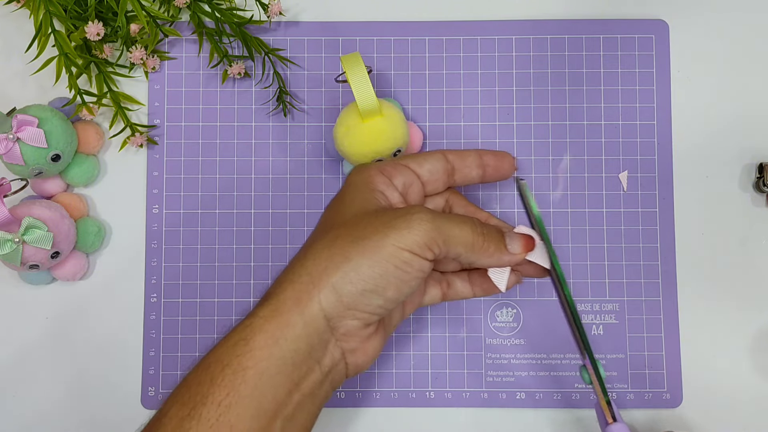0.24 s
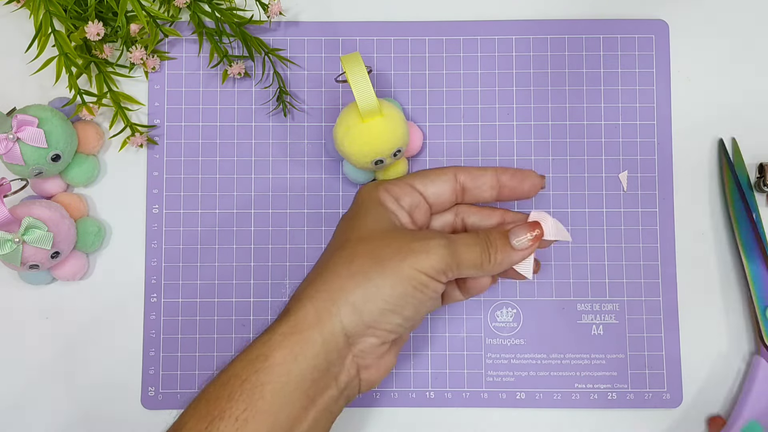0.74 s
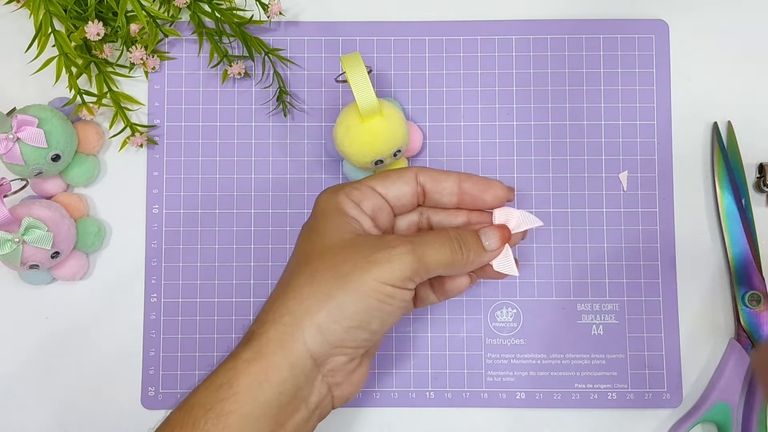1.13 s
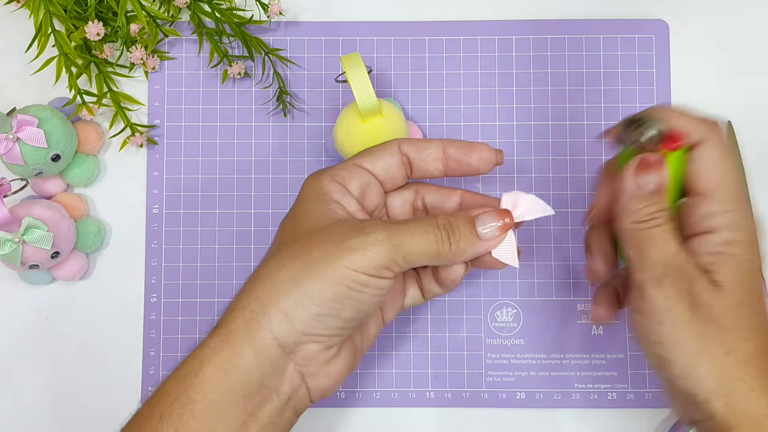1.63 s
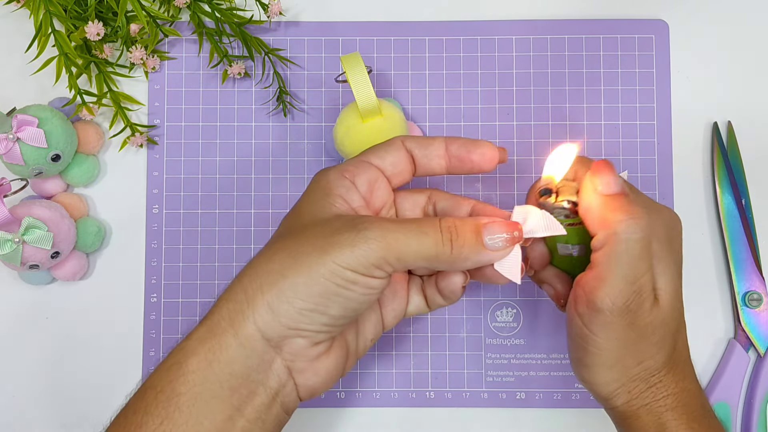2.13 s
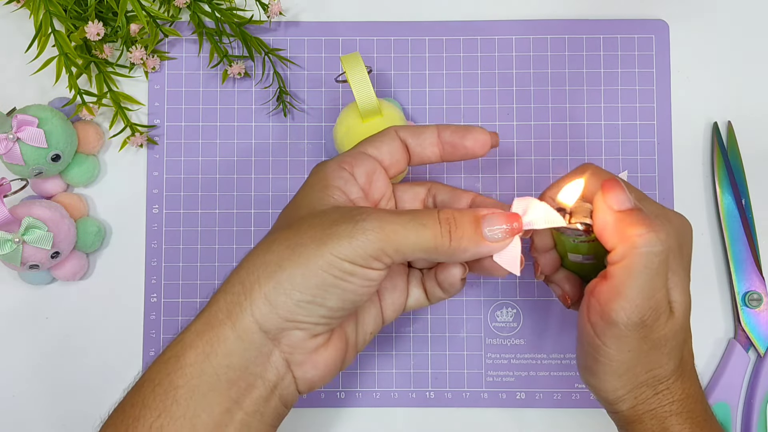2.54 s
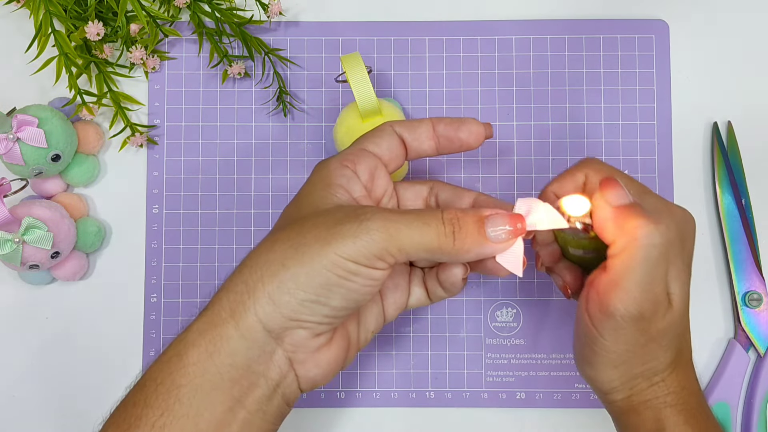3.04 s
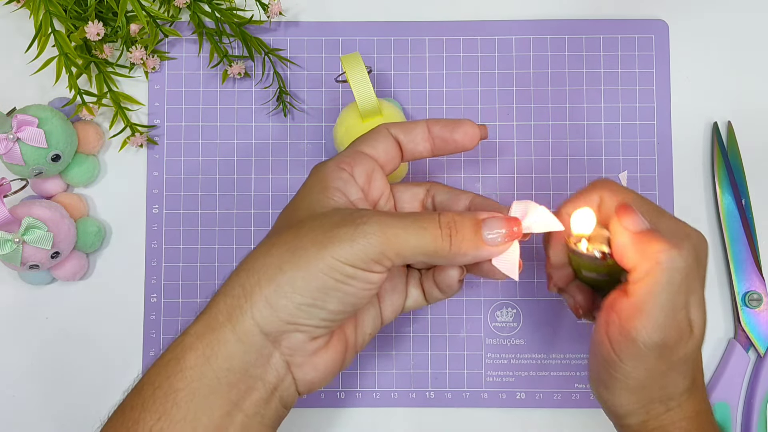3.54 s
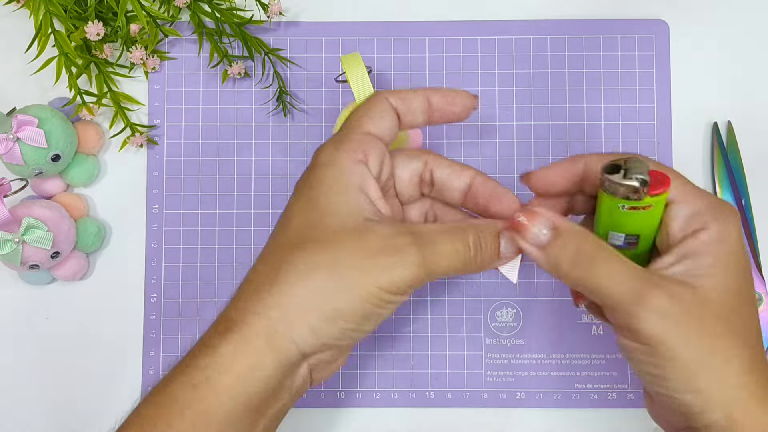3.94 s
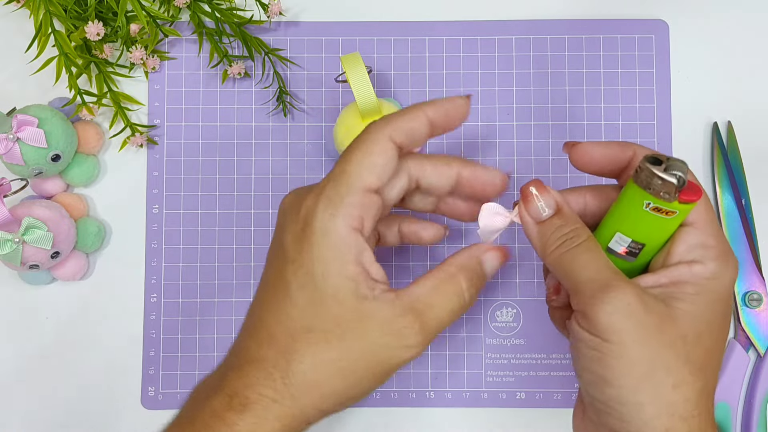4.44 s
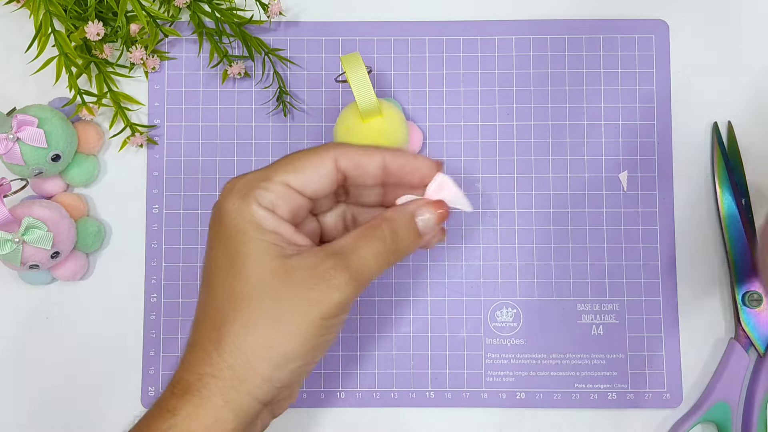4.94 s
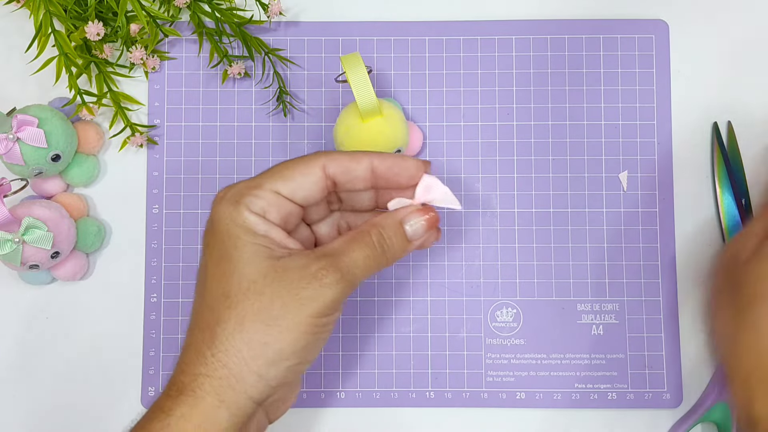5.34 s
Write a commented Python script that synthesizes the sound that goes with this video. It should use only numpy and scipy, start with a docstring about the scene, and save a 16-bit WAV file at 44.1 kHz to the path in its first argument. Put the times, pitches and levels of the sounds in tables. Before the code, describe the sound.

In a small hard room, close stereo microphone with bass leaning left: a faint crisp scissor snip, then scissors laid on a craft table with a knock and a rapid metallic, plastic clatter. Light finger rustle, a quick rising spark-wheel rasp ending abruptly, tiny clicks, a quiet pause, a lighter click and soft rubs, then the lighter is put down with hard knocks, short scrapes and fading taps over low rumble.

```python
"""Over a steady low rumble, scissors shear a ribbon (noise through a sharp resonance) and are laid on a
craft table with a few bounces (noise cracks, decaying modes, scraping contacts). Fingers rustle as fine
grains; a lighter's spark wheel swells as its teeth bite faster, then stops. The lighter is handled with
clicks and rubs and put back with further knocks. A small hard room reflects all of it into two microphone
ports, the right one poor in bass, and a peak limiter."""
import sys
import numpy as np
from scipy import signal
from scipy.fft import rfft, irfft
from scipy.io import wavfile

SR = 44100
rng = np.random.default_rng(int(sys.argv[2]) if len(sys.argv) > 2 else 0)


def digitize_waveform(pressure):
    """Quantize a signal to 16-bit integers and store it at the path in sys.argv[1].

    Rows of a 2-D input are taken as channels; values are limited to [-1, 1].
    """
    field = np.atleast_2d(pressure).T
    bounded = np.clip(field, -1, 1)
    quanta = np.round(bounded * 32767).astype(np.int16)
    wavfile.write(sys.argv[1], SR, quanta)


N = 246959  # length in samples


def amp(db):
    """Decibel law: the amplitude gain of a level in dB."""
    return 10 ** (np.asarray(db) / 20)


def rms_one(x):
    """Power normalisation: scaled to rms 1."""
    return x / np.sqrt(np.mean(x ** 2) + 1e-20)


def at_hz(points, hz):
    """Interpolation along a logarithmic frequency axis."""
    table = np.array(points)
    return np.interp(np.log(hz), np.log(table[:, 0]), table[:, 1])


def convolve(x, response):
    """Linear superposition: causal convolution, cut to length."""
    return signal.fftconvolve(np.atleast_2d(x), np.atleast_2d(response), axes=1)[:, :N]


def colour(x, spectrum):
    """Minimum-phase filtering: the dB shape fixes the phase through the folded cepstrum."""
    size = 8192
    hz = np.maximum(np.fft.rfftfreq(size, 1 / SR), 1)
    cepstrum = irfft(np.log(amp(at_hz(spectrum, hz))))
    cepstrum[1:size // 2] *= 2
    cepstrum[size // 2 + 1:] = 0
    return convolve(x, irfft(np.exp(rfft(cepstrum))))


def sides(db):
    """Level-difference stereo: left and right gains for a left-right difference in dB."""
    return amp(np.multiply.outer([.5, -.5], np.atleast_1d(db)))


def grains(per_s, spread_db):
    """Random contact noise: sparse impulses of uneven size, separate for each port; rms 1."""
    size_db = spread_db * np.minimum(rng.exponential(1, (2, N)), 5)
    sizes = amp(size_db) * rng.choice([-1, 1], (2, N))
    return rms_one(sizes * (rng.random((2, N)) < per_s / SR))


# Background spectrum. Each row: frequency in Hz, relative level in dB.
RUMBLE_SPECTRUM = [(12, -22.5), (20, 11), (38, -15.5), (63, -4.5), (122, -15), (144, -12.5), (179, -5.5),
                   (310, -16), (615, -20.5), (832, -24), (1090, -25), (3860, -42.5), (9030, -41.5),
                   (12500, -48), (14000, -59)]
RUMBLE_DB = -36
# Coherence of the background. Each row: frequency in Hz, left-right likeness as a share of power.
RUMBLE_LIKENESS = [(30, 0.24), (130, 0.75), (290, 0.15), (640, 0.042), (15000, 0.0074)]


def rumble():
    """Partial coherence: shared and separate noise mix to a background most alike in the bass."""
    shared, own = rng.standard_normal(N), rng.standard_normal((2, N))
    likeness = [(hz, np.clip(part, 1e-3, .99)) for hz, part in RUMBLE_LIKENESS]
    shared_db = [(hz, 10 * np.log10(part)) for hz, part in likeness]
    own_db = [(hz, 10 * np.log10(1 - part)) for hz, part in likeness]
    mixed = colour(shared, shared_db) + colour(own, own_db)
    return amp(RUMBLE_DB) * rms_one(colour(mixed, RUMBLE_SPECTRUM))


# Blades shearing the ribbon. Each row: start in seconds, level in dB, length before the fade in seconds.
SNIPS = [(0.214, -55, 0.0071), (0.253, -36.5, 0.013)]
# the blades' edge sings at this resonance
SNIP_HZ, SNIP_SHARPNESS, SNIP_BROAD_SHARE = 9100, 25, 1.5
# Skin on ribbon and plastic. Each row: start in seconds, level in dB, length before the fade in seconds.
FINGER_RUBS = [(1.59, -55, 0.01), (1.633, -46, 0.039), (1.696, -46.5, 0.042), (2.331, -51, 0.03),
               (3.805, -47.5, 0.017), (4.037, -46.5, 0.012), (4.284, -44.5, 0.012), (4.797, -43, 0.0058),
               (4.957, -51.5, 0.044), (5.029, -52, 0.031)]
RUB_HZ = 8100  # brightest resonance


def rubs(rows, peak_hz, sharpness, broad_share):
    """Friction noise: dense fine contacts excite one resonance, with a quick start and a fade."""
    fine = grains(per_s=7100, spread_db=2.5)
    bright = signal.lfilter(*signal.iirpeak(peak_hz, sharpness, fs=SR), fine)
    broad = signal.lfilter(*signal.butter(2, [1800, 10500], "band", fs=SR), fine)
    strokes = 0
    for s, db, length in rows:
        u = (np.arange(N) / SR - s) / length  # time in stroke lengths
        rise, fade = np.clip(u / 0.43, 0, 1), np.exp(-4.0 * np.maximum(u - 1, 0))
        strokes = strokes + amp(db) * rise * fade
    return strokes * (rms_one(bright) + broad_share * rms_one(broad)) * sides(2.57)


# Spectrum of a crack. Each row: frequency in Hz, relative level in dB.
CRACK_SPECTRUM = [(880, -22.5), (1500, -7), (2740, -3), (3840, -12), (4690, -6), (5880, -4.5), (7610, 1),
                  (11000, -18), (16000, -54.5)]


def cracks(s, db, pan_db, t60):
    """Impact noise: each contact starts a coloured burst that decays exponentially within milliseconds."""
    starts = np.zeros((2, N))
    starts[:, np.round(s * SR).astype(int)] = amp(db) * sides(pan_db)
    envelope = signal.lfilter([1], [1, -amp(-60 / (t60 * SR))], starts + 1e-18)
    return rms_one(colour(rng.standard_normal((2, N)), CRACK_SPECTRUM)) * envelope


SETTLE_S = .016  # delay after a blow until the part settles on the table and damps its ring


def struck(modes, s, db, pan_db, scatter_db, flips, damping, detune=0, rise=1e-4, settle_db=0):
    """Modal superposition: each blow rings all modes, scattered in strength and pitch; damping shortens t60."""
    hz, mode_db, t60 = np.transpose(modes)[:, :, None]
    t = np.arange(round(.3 * SR)) / SR
    out = np.zeros((2, N + SR))
    settling = amp(settle_db * np.clip((t - SETTLE_S) / 0.0012, 0, 1))
    shape = np.minimum(t / rise, 1) * settling
    signs = (-1) ** np.arange(len(modes))[:, None]
    flip_draws = rng.random((len(s), len(modes), 1))
    strengths, shifts = rng.standard_normal((2, len(s), len(modes), 1))
    starts = np.round(s * SR).astype(int)
    for start, level_db, flip, strength, shift in zip(starts, db, flip_draws, strengths, shifts):
        decay_db = 60 * damping * t / t60
        rings = signs * amp(level_db + mode_db + scatter_db * strength - decay_db)
        rings = rings * np.sin(2 * np.pi * hz * (1 + detune * shift) * t) * shape
        right = rings * np.where(flip < flips, -1, 1)  # small parts reach the ports in changing sign
        out[:, start:start + len(t)] += [rings.sum(axis=0), right.sum(axis=0)]
    return out[:, :N] * sides(pan_db) / np.sqrt(len(modes))


# Scissors and lighter meeting the table. Each row: start in seconds, relative levels of crack, knock and
# table thump in dB, clack frequency in Hz, relative clack level in dB.
BLOWS = [(0.5475, -82, -63, -39, 1000, -60), (0.7065, 0, -10.5, -4, 978, -6),
         (0.8656, -53, -38, -21, 590, -58), (0.965, -7, -9.5, -11.5, 2660, -5),
         (0.9667, -11, -21, -32, 5100, -8), (1.024, -41.5, -10.5, -3.5, 479, -5),
         (1.0312, -31, -17, -23, 1660, -7), (1.0344, -13, -6, -10, 3830, 1),
         (1.0404, -25, -6, -18, 2530, 5), (1.0459, -25, -15, -31, 3950, -5),
         (1.054, -8.5, -13, -8.5, 4900, -5), (1.06, -28, -10.5, -15, 2530, -1),
         (1.0728, -23, -10.5, -4.5, 2480, -20), (1.1096, -25, -17.5, -8.5, 2500, -31),
         (1.151, -31, -22, -19, 500, -27), (1.2937, -26.5, -38, -27, 7900, -28),
         (1.3029, -26, -19.5, -33, 1270, -16.5), (1.3052, -36, -32, -32, 2450, -17.5),
         (1.308, -42, -21.5, -24, 1780, -12), (1.338, -24, -32, -19, 2560, -21),
         (1.361, -26, -38, -28, 2800, -36), (1.417, -29, -53, -49, 7500, -41),
         (1.435, -40, -51, -41.5, 2640, -35), (3.732, -42.5, -47.5, -41, 2610, -28),
         (3.926, -55, -45, -46, 992, -34.5), (5.2, -14.5, -3, -8.5, 2740, -1),
         (5.2014, -40, -16.5, -42, 469, -4), (5.24, 1.5, -15, -18, 7340, -25),
         (5.244, -28, -28, -32, 1950, -10), (5.267, -20, -15, -35, 5170, -12),
         (5.271, -7.5, -19, -33, 2670, -2), (5.3339, -27, -28, -18, 490, -44),
         (5.357, -36, -41, -30, 595, -29), (5.381, -38, -32, -27, 760, -29),
         (5.4182, -50, -26, -20.5, 530, -39), (5.428, -50, -43, -41, 730, -19),
         (5.436, -55, -45, -43, 390, -20), (5.514, -60, -53, -34, 395, -29),
         (5.5342, -20, -27, -55, 2050, -19.5), (5.536, -27, -40, -48, 5600, -21),
         (5.553, -23, -42, -61, 1400, -14)]
# Blade modes. Each row: frequency in Hz, relative level in dB, t60 in seconds before damping.
STEEL_MODES = [(2446, 14, 0.074), (2627, 12, 0.086), (3680, -16, 0.0077), (4100, -5, 0.025),
               (5000, 21, 0.029), (5900, 15, 0.033), (7200, 14, 0.028), (8530, 16.5, 0.043),
               (9700, 3, 0.033)]
# Modes of handles and shell. Each row: frequency in Hz, relative level in dB, t60 in seconds before damping.
SHELL_MODES = [(723.5, 1.5, 0.042), (771.6, 3.5, 0.054), (911, -3, 0.035), (1020, -0.5, 0.041),
               (1280, -10.5, 0.04), (1529, -2.5, 0.033), (1836, -8, 0.057), (2096, -4, 0.015)]
# Table-top modes. Each row: frequency in Hz, relative level in dB, t60 in seconds before damping.
TABLE_MODES = [(122, -5.5, 0.12), (162.3, -7, 0.194), (185.5, -3.5, 0.28), (216.8, 4, 0.27),
               (286, -4.5, 0.086), (378.4, -5, 0.24), (486, -5, 0.12), (606, -8, 0.07)]
SCISSORS_DOWN_S = 1.2  # later blows are the plastic lighter: no steel
BLOW_PAN_DB = -2  # left-right dB
SETTLE_DB = -10  # level drop when the part settles
STEEL_DAMPING, STEEL_SCATTER_DB = 5.5, 1.5
TABLE_RISE_S = 0.0034  # the board takes time to get going
BOARD_EDGE_HZ = 100  # a board this size radiates little below
CLACK_CYCLES = 19.5  # cycles to die by 60 dB, before damping


def blows():
    """Impact excitation: noise crack, ringing steel and plastic, table thump and a clack from the part that touches."""
    s, crack_db, knock_db, thump_db, clack_hz, clack_db = np.transpose(BLOWS)
    scissors = s < SCISSORS_DOWN_S
    steel = amp(-4) * struck(STEEL_MODES, s[scissors], crack_db[scissors], BLOW_PAN_DB,
                             scatter_db=STEEL_SCATTER_DB, flips=0.54, damping=STEEL_DAMPING,
                             detune=0.033, rise=0.00096)
    shell = amp(5.5) * struck(SHELL_MODES, s, knock_db, BLOW_PAN_DB, scatter_db=4.5, flips=0.32,
                              damping=1.46, detune=0.031, rise=0.00015)
    table = amp(6) * struck(TABLE_MODES, s + 0.001, thump_db, 0, scatter_db=3.0, flips=0,
                            damping=1.54, detune=0.013, rise=TABLE_RISE_S, settle_db=SETTLE_DB)
    table = signal.sosfilt(signal.butter(2, BOARD_EDGE_HZ, "high", fs=SR, output="sos"), table)
    clack = 0
    for k, hz in enumerate(clack_hz):
        pair = [(hz * (1 + side), 0, CLACK_CYCLES / hz) for side in (-.06, .06)]
        clack = clack + struck(pair, s[k:k + 1], clack_db[k:k + 1], BLOW_PAN_DB, scatter_db=0.88,
                               flips=0.19, damping=0.6, rise=0.00065, settle_db=SETTLE_DB)
    return cracks(s, crack_db, BLOW_PAN_DB, t60=0.019), steel + shell + clack, table


# Small dry clicks of the lighter's lever and shell. Each row: start in seconds, level in dB, pitch in Hz.
TICKS = [(0.665, -36, 9160), (1.983, -27, 8500), (2.2729, -30.5, 4520), (2.3418, -33.5, 4800),
         (3.7321, -22, 6900), (3.744, -33, 6800), (3.753, -31, 6400), (4.0042, -37.5, 7250),
         (4.874, -39.5, 2820), (4.929, -39, 8950)]
TICK_PAN_DB, TICK_SCATTER_DB = -3, 2.5  # left-right dB, dB
TICK_RING_S = .007  # t60 before damping


def ticks():
    """Damped resonance: a short crack with one quickly dying ring."""
    s, db, hz = np.transpose(TICKS)
    out = cracks(s, db, TICK_PAN_DB, t60=0.019)
    for k in range(len(s)):
        out += struck([(hz[k], -7, TICK_RING_S)], s[k:k + 1], db[k:k + 1], TICK_PAN_DB,
                      TICK_SCATTER_DB, flips=0.3, damping=0.573)
    return out


def ring(clicks, hz, t60):
    """Two-pole resonator: a unit click sets a sine of about height 1 ringing."""
    r, w = amp(-60 / (t60 * SR)), 2 * np.pi * hz / SR
    return signal.lfilter([0, np.sin(w)], [1, -2 * r * np.cos(w), r * r], clicks + 1e-18)


# Objects rocking and dragging on the table top. Each row: start in seconds, scrape level in dB, body rumble
# level in dB, time from start to fade in seconds, fade in dB per second.
DRAGS = [(0.706, -23, -28, 0.012, 230), (0.965, -21, -27, 0.012, 250), (5.2, -22, -28, 0.008, 450),
         (1.036, -21, -27, 0.03, 200), (1.028, -21, -24, 0.02, 600), (0.879, -41, -53, 0.063, 300),
         (1.295, -30, -24, 0.03, 150), (1.41, -42, -40, 0.035, 400), (5.236, -10, -21, 0.016, 190),
         (5.3, -27, -28.5, 0.05, 200), (5.424, -55, -33.5, 0.013, 304), (5.539, -28.5, -32, 0.018, 200)]
# Scrape spectrum. Each row: frequency in Hz, relative level in dB.
SCRAPE_SPECTRUM = [(88, -50), (150, -23), (216, 12), (301, -31), (753, -0.5), (991, -8), (1850, -6.5),
                   (7180, -13.5), (12000, -31.5), (15600, -69), (22000, -120)]
DRAG_RISE_S = .008


def drags():
    """Sliding friction: uneven contacts scrape the table top and shake shell and table; rise, hold, steady fade."""
    scrape = rumbling = 0
    for s, scrape_db, body_db, hold, fade_db in DRAGS:
        t = np.arange(N) / SR - s
        pressure = np.clip(t / DRAG_RISE_S, 0, 1) * amp(-fade_db * np.maximum(t - hold, 0))
        scrape = scrape + amp(scrape_db) * pressure
        rumbling = rumbling + amp(body_db) * pressure
    bumps = grains(per_s=970, spread_db=-0.5)[0]
    body = 0
    for k, (hz, db, t60) in enumerate(TABLE_MODES[4:] + SHELL_MODES[:6]):
        body = body + amp(db) * ring(bumps, hz, t60 / 3.1) * (-1) ** k
    scraping = rms_one(colour(grains(per_s=2500, spread_db=5.0), SCRAPE_SPECTRUM))
    return scraping * scrape + rms_one(body) * rumbling


# Spark wheel resonances. Each row: frequency in Hz, width in Hz, relative level in dB.
WHEEL_MODES = [(2480, 460, -13.5), (3600, 600, -16), (4430, 600, -14), (5400, 510, -11.5), (6160, 810, -9),
               (7100, 740, -5), (8480, 800, 2.5), (9050, 850, 2), (13900, 1100, -20.5)]
# the wheel catches the flint, swells as it speeds up, slips off at its loudest
WHEEL_START_S, WHEEL_SLIP_S, WHEEL_DB = 1.8, 2.026, -7.5
WHEEL_SWELL_DB_PER_S, WHEEL_STOP_DB_PER_S = 720, 4000
TEETH_PER_S_START, TEETH_PER_S_SLIP, TOOTH_JITTER_S, TOOTH_SCATTER_DB = 190, 480, .0004, 1.5
BITE_S, GRIT_BETWEEN_BITES, GRIT_SPREAD_DB = .0024, .35, 2.5


def spark_wheel():
    """Modulated friction: teeth bite ever faster as the wheel spins up and spray grit into its resonances."""
    t = np.arange(N) / SR - WHEEL_SLIP_S
    spin = np.clip(1 + t / (WHEEL_SLIP_S - WHEEL_START_S), 0, 1)
    teeth_per_s = TEETH_PER_S_START + (TEETH_PER_S_SLIP - TEETH_PER_S_START) * spin ** 2
    teeth_passed = np.cumsum(teeth_per_s * (spin > 0) * (t < 0)) / SR
    at = np.flatnonzero(np.diff(np.floor(teeth_passed)) > 0)
    jitter = (TOOTH_JITTER_S * SR * rng.standard_normal(len(at))).astype(int)
    teeth = np.zeros(N)
    teeth[at + jitter] = amp(TOOTH_SCATTER_DB * rng.standard_normal(len(at)))
    half = round(BITE_S * SR / 2)
    bites = np.convolve(teeth, np.hanning(2 * half), "same")
    grit = grains(per_s=10000, spread_db=GRIT_SPREAD_DB) * (GRIT_BETWEEN_BITES + bites)
    modes = 0
    for k, (hz, width, db) in enumerate(WHEEL_MODES):
        modes = modes + amp(db) * signal.lfilter(*signal.iirpeak(hz, hz / width, fs=SR), grit) * (-1) ** k
    spin_db = WHEEL_DB + np.minimum(WHEEL_SWELL_DB_PER_S * t, -WHEEL_STOP_DB_PER_S * t)
    return rms_one(modes) * amp(spin_db) * (spin > 0) * sides(8.7)


# Reverberation. Each row: frequency in Hz, t60 in seconds.
ROOM_T60 = [(100, 0.8), (300, 0.31), (1000, 0.29), (3000, 0.24), (8000, 0.3)]
# Colour of the reflections. Each row: frequency in Hz, gain in dB.
ROOM_COLOUR = [(100, -5), (400, 4.5), (1500, 0.5), (4000, -0.5), (8500, -3), (10500, -8.5), (15000, 3)]


def room(x):
    """Diffuse reverberation: noise decays octave by octave, increasingly different at each port in the treble."""
    t = np.arange(round(.6 * SR)) / SR
    shared, own = rng.standard_normal(len(t)), rng.standard_normal((2, len(t)))
    tail, edges = 0, 44 * 2. ** np.arange(9.5)
    for low, high in zip(edges, np.minimum(edges[1:], .45 * SR)):
        hz = np.sqrt(low * high)
        alike = 1 / (1 + (hz / 500) ** 2)
        mixed = np.sqrt(alike) * shared + np.sqrt(1 - alike) * own
        band = signal.sosfilt(signal.butter(2, [low, high], "band", fs=SR, output="sos"), mixed)
        tail = tail + band * amp(-60 * t / at_hz(ROOM_T60, hz))
    tail = tail * np.minimum(t / 0.0029, 1)  # reflections build up
    unit_tail = tail / np.sqrt(np.sum(tail ** 2) / 2)
    return colour(convolve(x[0], unit_tail), ROOM_COLOUR)


ROOM_DB = -3
SNIP_ROOM_DB = -6  # cut close under the microphone, so its reflections are weaker
TABLE_ROOM_DB = -8.5  # level at which the table thump feeds the room
RING_ROOM_DB = -2  # level at which the ringing parts feed the room
WHEEL_ROOM_DB = -2  # cupped in the hand


def scene():
    """Superposition: direct sound of hands and tools, their reflections and the background."""
    snip = rubs(SNIPS, SNIP_HZ, SNIP_SHARPNESS, SNIP_BROAD_SHARE)
    fingers = rubs(FINGER_RUBS, RUB_HZ, sharpness=12.0, broad_share=0.47)
    crack, rings, thumps = blows()
    near = crack + ticks() + fingers + drags()
    wheel = spark_wheel()
    sent = near + amp(TABLE_ROOM_DB) * thumps + amp(RING_ROOM_DB) * rings
    sent = sent + amp(SNIP_ROOM_DB) * snip + amp(WHEEL_ROOM_DB) * wheel
    reflected = room(sent)
    return near + rings + thumps + wheel + snip + amp(ROOM_DB) * reflected + rumble()


# Difference of the microphone ports. Each row: frequency in Hz, left-right difference in dB.
PORTS = [(60, 10), (110, 11), (200, 9.5), (380, 11), (700, 9.5), (1290, 8.5), (2380, 6), (4400, 0),
         (8120, 4.5), (15000, 3)]
# Treble response of the microphone. Each row: frequency in Hz, gain in dB.
TOP_ROLL_OFF = [(9600, -1.5), (10500, -10), (12500, -4.5), (16000, -17)]
LIMIT_DB, RELEASE_DB_PER_S = 3, 42.5
CUTOFF_HZ = 16200


def record(dry):
    """Peak limiting: unequal, dull ports; gain ducks on peaks and recovers steadily; rounded peaks, top cut."""
    left, right = [colour(dry[k], [(hz, side * db) for hz, db in PORTS]) for k, side in enumerate((.4, -.6))]
    ports = colour(np.vstack([left, right]), TOP_ROLL_OFF)
    peak_db = 20 * np.log10(np.abs(ports).max(axis=0) + 1e-9)
    over = np.maximum(peak_db - LIMIT_DB, 0)
    ramp = RELEASE_DB_PER_S * np.arange(N) / SR
    held = np.maximum.accumulate(over + ramp) - ramp
    pole = np.exp(-1 / (0.00028 * SR))  # attack time constant in seconds
    duck_db = signal.lfilter([1 - pole], [1, -pole], held)
    limited = 1.067 * np.tanh(ports * amp(-duck_db) / 1.138)
    top_cut = signal.cheby2(12, 60, CUTOFF_HZ, fs=SR, output="sos")
    return np.clip(signal.sosfilt(top_cut, limited), -1, 1)


dry = scene()
out = record(dry)
digitize_waveform(out)
```